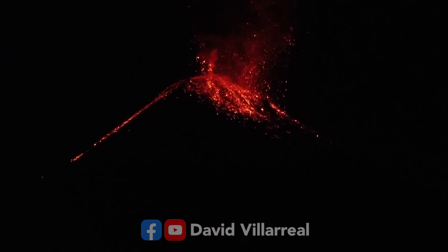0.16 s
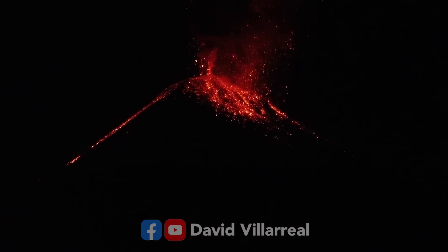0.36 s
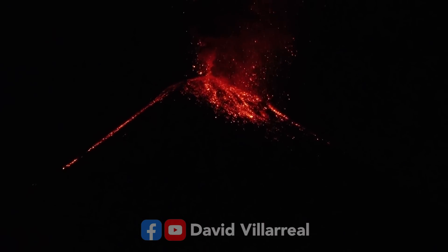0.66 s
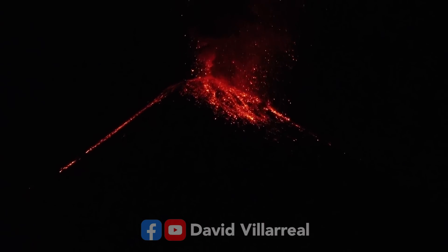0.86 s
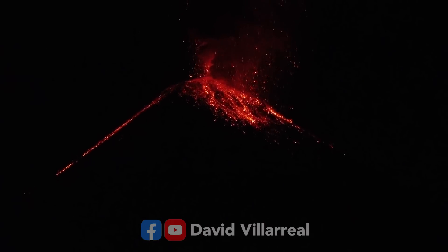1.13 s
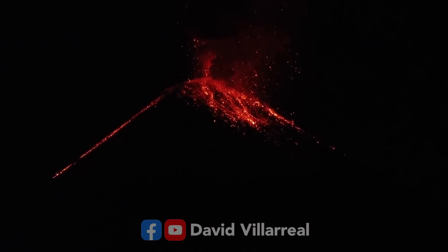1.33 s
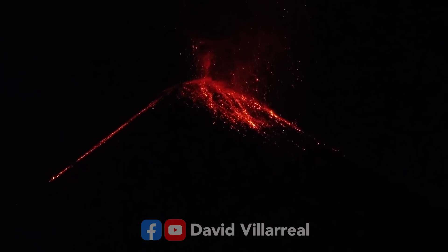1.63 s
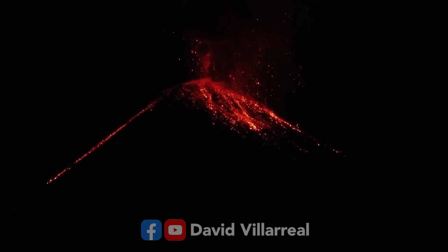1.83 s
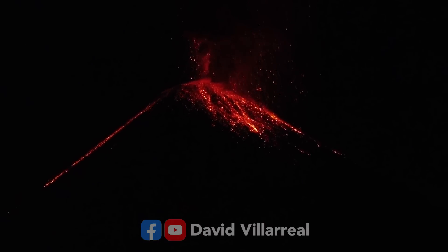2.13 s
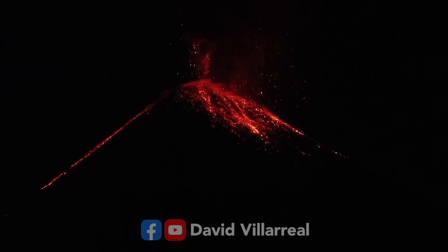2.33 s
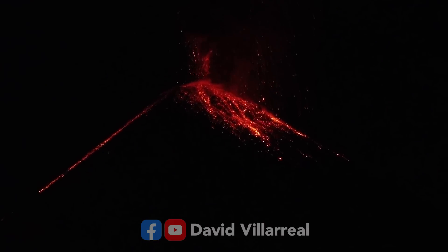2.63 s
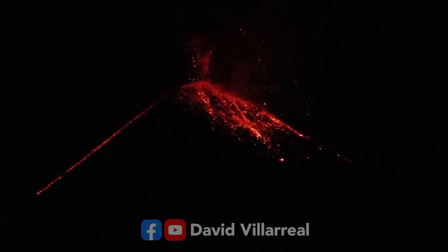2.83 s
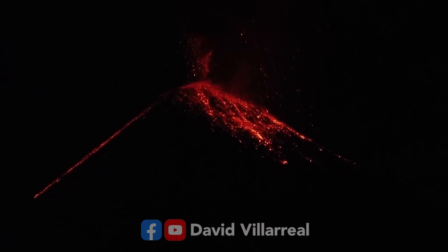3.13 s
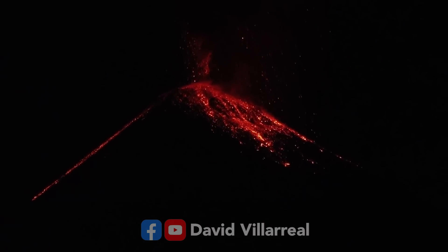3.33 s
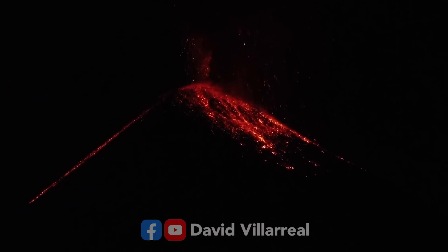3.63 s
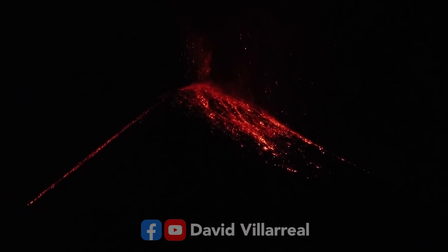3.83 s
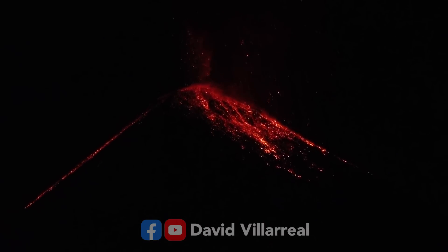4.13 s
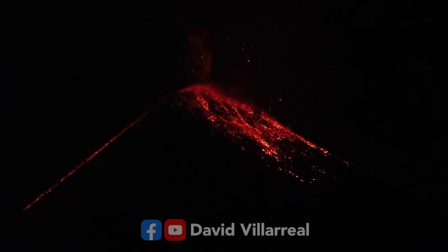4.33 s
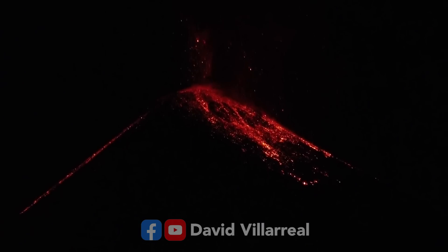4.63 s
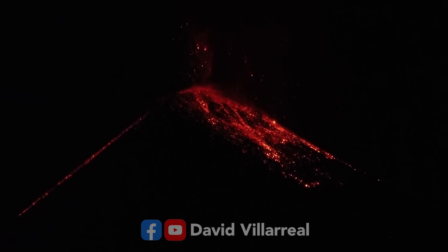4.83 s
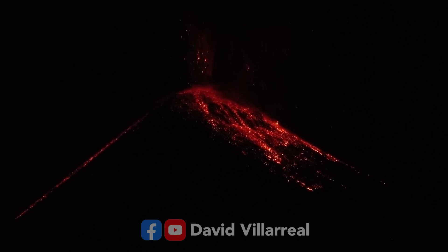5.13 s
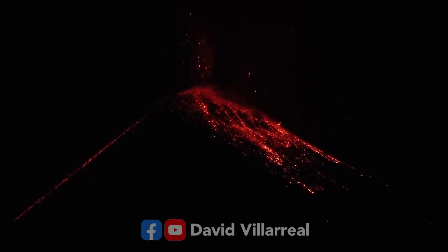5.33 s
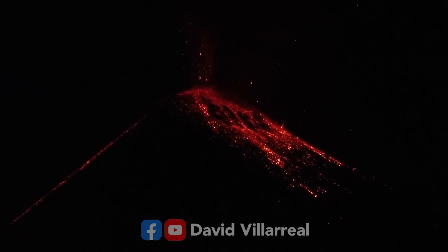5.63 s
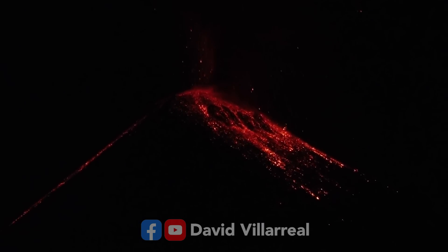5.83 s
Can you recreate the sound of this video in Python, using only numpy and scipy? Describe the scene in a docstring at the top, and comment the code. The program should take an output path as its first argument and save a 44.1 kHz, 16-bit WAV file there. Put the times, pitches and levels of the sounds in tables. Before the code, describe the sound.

Outdoors at night, a far volcanic explosion is already at full force: deep bass rumble, uneven booms and a wide roar, with gas rushing and hissing on top. After about two seconds the bright hiss drops away and the roar sinks, leaving rolling low rumble, brief soft gas surges, dull block thuds and faint stone knocks. Distant stereo pickup, with slope echoes spreading wider.

```python
"""Far volcanic blast

The blast is a deep rumble, boom, roll and roar: bands of lumpy noise that follow level curves.
Gas rushes and hisses on top in bursts and surges, six brighter bands over a slowly falling aftermath.
Echoes from the slopes widen the roar and the aftermath of the gas as they fade: more scattered noise.
Blocks land with dull thuds and stones with short knocks, each a soft burst of a few cycles."""
import sys
import numpy as np
from scipy.fft import rfft, irfft, next_fast_len
from scipy.io import wavfile
from scipy.ndimage import map_coordinates

SR = 44100
rng = np.random.default_rng(int(sys.argv[2]) if len(sys.argv) > 2 else 0)


def to_wav(s):
    """Save 16-bit WAV."""
    ch = np.atleast_2d(s).T  # columns
    pcm = np.round(np.clip(ch, -1, 1) * 32767)  # PCM
    wavfile.write(sys.argv[1], SR, pcm.astype(np.int16))


N = 263277
TIME_S = np.arange(N) / SR

# Course of the bass, only its change counts: (time [s], level [dB])
BASS_COURSE = [(0, -24), (.12, -25), (.3, -24), (.47, -25), (.65, -22), (.75, -23), (.9, -21), (1.1, -21.5),
               (1.3, -23.5), (1.52, -23.5), (1.64, -22), (1.75, -26.5), (1.95, -25.5), (2.3, -26.5),
               (2.8, -27.5), (3.15, -31), (3.3, -29), (3.9, -33), (4.1, -30.5), (4.25, -33), (4.5, -32.5),
               (4.7, -30), (5.0, -32), (5.3, -30), (5.5, -33), (5.7, -31.5), (5.97, -32)]
# Scattered against direct bass, trimmed per layer: (time [s], ratio [dB])
BASS_SCATTER = [(0, -6), (.8, -9), (1.6, -5), (3.7, -3.5), (4.4, -5), (4.9, -7), (5.97, -2.5)]


def amp(db):
    """Decibels to gain."""
    return 10 ** (np.asarray(db) / 20)


def power(db):
    """Decibels to power ratio."""
    return amp(2 * db)


def unit(x):
    """Scaled to rms 1."""
    return x / np.sqrt(np.mean(x ** 2) + 1e-20)


def curve(rows):
    """(time [s], value) rows to one value per sample."""
    s, value = np.transpose(rows)
    return np.interp(TIME_S, s, value)


def change(rows):
    """Change of a level curve since the start, dB."""
    level_db = curve(rows)
    return level_db - level_db[0]


def wobble(knots_per_s):
    """Smooth random curve through normally distributed knots."""
    knots = rng.standard_normal(int(N * knots_per_s / SR) + 4)
    return map_coordinates(knots, [np.arange(N) * knots_per_s / SR])


def filtered(x, response):
    """x times a zero-phase response of frequency in Hz."""
    m = next_fast_len(N + 8192)
    spectrum = rfft(x, m) * response(np.fft.rfftfreq(m, 1 / SR))
    return irfft(spectrum, m)[..., :N]


def sides(pan_db):
    """Left and right gains for a left minus right level, fixed or per sample."""
    return amp(np.multiply([[.5], [-.5]], pan_db))


def turbulence(colour, level_db, scattered_db, pan_db, lumps_db, lumps_per_s):
    """Stereo noise: a direct part alike on both sides, a scattered part of opposite sign."""
    hz, db = np.transpose(colour)
    lumpy = rng.standard_normal((2, N)) * amp(lumps_db * wobble(lumps_per_s))
    bands = filtered(lumpy, lambda f: amp(np.interp(np.log(f + 1), np.log(hz + 1), db)))
    direct, scattered = unit(bands)
    scattered = scattered * amp(np.minimum(scattered_db, 0))
    return np.array([direct + scattered, direct - scattered]) * amp(level_db) * sides(pan_db)


def ground():
    """Deepest rumble: noise that follows the bass course in part."""
    # (frequency [Hz], response [dB])
    colour = [(2, -6.5), (10, -4), (30, -3), (55, -1), (90, -18.5), (200, -120)]
    level_db = -24.3 + 0.74 * change(BASS_COURSE)
    scattered_db = curve(BASS_SCATTER) - .4
    return turbulence(colour, level_db, scattered_db, pan_db=1.7, lumps_db=0.6, lumps_per_s=5.5)


def boom():
    """Bass noise rolling in uneven surges."""
    # (frequency [Hz], response [dB])
    colour = [(20, -120), (40, -14.5), (65, -2.5), (100, 1), (125, -6), (170, -19.5), (400, -120)]
    # Only its change counts: (time [s], level [dB])
    course = [(0, -25), (.2, -22.5), (.42, -26), (.55, -18.5), (.7, -19), (.85, -23.5), (1.05, -21.5),
              (1.15, -24), (1.25, -22), (1.45, -21.5), (1.55, -25), (1.65, -20.5), (1.8, -25), (1.95, -23),
              (2.5, -25), (2.7, -22), (3.1, -25), (3.35, -28), (3.55, -25.5), (3.75, -27.5), (3.88, -23),
              (3.99, -30), (4.05, -28), (4.12, -23.5), (4.27, -30), (4.42, -23), (4.55, -26), (4.65, -32),
              (4.75, -26), (4.85, -29), (4.96, -25), (5.03, -29), (5.1, -24.5), (5.25, -21.5), (5.37, -28),
              (5.46, -22.5), (5.57, -30), (5.66, -25.5), (5.8, -24), (5.97, -27)]
    level_db = -25 + 1.05 * change(course)
    scattered_db = curve(BASS_SCATTER) + .4
    return turbulence(colour, level_db, scattered_db, pan_db=0, lumps_db=0.16, lumps_per_s=12)


def roll():
    """Low roll above the boom: lumpier noise on the bass course."""
    # (frequency [Hz], response [dB])
    colour = [(50, -120), (110, -5.5), (160, 0.5), (250, -2), (330, -5.5), (480, -26), (1100, -120)]
    level_db = -22.5 + .95 * change(BASS_COURSE)
    scattered_db = .5 * curve(BASS_SCATTER) - 1.5
    return turbulence(colour, level_db, scattered_db, pan_db=-.7, lumps_db=1.66, lumps_per_s=18)


def roar():
    """Roar of gas and falling rock: fading midrange noise, ever more scattered."""
    # (frequency [Hz], response [dB])
    colour = [(110, -120), (250, -9.5), (350, -1), (600, -4), (900, -10.5), (1300, -24), (3000, -120)]
    # Only its change counts: (time [s], level [dB])
    course = [(0, -23.5), (.5, -25), (1.1, -22.5), (1.46, -24), (1.7, -25), (2.0, -25.5), (2.28, -25),
              (2.38, -27), (2.5, -26.5), (2.62, -29), (2.75, -29.5), (3.15, -31), (3.4, -34.5), (3.65, -36),
              (3.9, -34), (4.1, -35), (4.3, -38.5), (4.7, -37.5), (4.97, -38), (5.5, -39), (5.97, -42)]
    level_db = -23 + 1.12 * change(course)
    scattered_db = -7 + 1.25 * TIME_S + .4
    return turbulence(colour, level_db, scattered_db, pan_db=-1, lumps_db=0.97, lumps_per_s=33)


def blast():
    """Low layers of the explosion; ground and boom drift between the slopes."""
    # (time [s], left minus right [dB])
    bass_lean = [(0, -1), (1.3, -2.5), (2.3, 0), (3.6, 2), (4.6, .2), (5.97, -2.5)]
    return (ground() + boom()) * sides(curve(bass_lean)) + roll() + roar()


def burst_power(burst_db, release_share):
    """Bright bursts from the vent: linear attack, hold, then a fall steady in dB."""
    # (start [s], attack [s], hold [s], relative strength [dB], release before the layer's share [dB/s])
    bursts = [(-.1, .012, 0.7, -.2, 36), (1.001, .007, 0.15, 1.2, 32), (1.151, 0.41, 0.36, 0.7, 34)]
    total = 0
    for start_s, attack_s, hold_s, db, fall_db_per_s in bursts:
        attack = np.clip((TIME_S - start_s) / attack_s, 0, 1)
        released_s = np.maximum(TIME_S - start_s - hold_s, 0)
        total = total + attack * power(burst_db + db - release_share * fall_db_per_s * released_s)
    return total


def surge_power(surge_db, bright_share):
    """Surges of gas: flat-topped humps in dB."""
    # (peak [s], rise [s], fall [s], relative strength [dB], brightness before the layer's share [dB])
    surges = [(.05, .1, .1, -6, -8), (.3, .16, .2, -7, 8.5), (.69, .08, .05, -8, 8), (1.52, .1, .08, -5, 7),
              (1.76, .09, .06, -8, 3), (2.05, .2, .18, -5, -12), (2.6, .14, .1, -17, 6.5),
              (3.04, .23, 0.175, 1.5, -.7), (3.54, .07, .1, -15, 6.5), (4.12, 0.31, 0.12, -5.8, -.3),
              (4.56, .08, .08, -11, 3), (4.97, 0.22, .2, -5.5, -7), (5.28, .08, .1, -13, 0)]
    edge_db, flatness = 8.5, 2.9  # loss one rise or fall time from the peak, flatness of the top
    total = 0
    for peak_s, rise_s, fall_s, db, bright_db in surges:
        distance = np.maximum((peak_s - TIME_S) / rise_s, (TIME_S - peak_s) / fall_s)
        total = total + power(surge_db + db + bright_share * bright_db - edge_db * distance ** flatness)
    return total


def flow(rule, wide_db):
    """Level and scatter of one jet layer, dB: bursts, aftermath and surges add in power."""
    # Only its change counts: (time [s], level [dB])
    aftermath = [(0, 0), (1.1, 1), (1.7, -1.5), (2.0, -.5), (2.25, -.5), (2.37, -3.5), (2.48, -3),
                 (2.6, -5.5), (2.8, -6.5), (3.15, -9), (3.33, -13), (3.5, -11), (3.9, -11), (4.25, -15),
                 (4.45, -15), (4.7, -13.5), (5.2, -15.5), (5.45, -17.5), (5.7, -17.5), (5.97, -19.5)]
    built_s = 3.43  # end of the build-up of the aftermath
    burst_db, release_share, after_db, fade_share, build_db_per_s, surge_db, bright_share = rule
    missing_db = build_db_per_s * np.maximum(built_s - TIME_S, 0)
    after = power(after_db + fade_share * change(aftermath) - missing_db)
    wide = after + burst_power(burst_db, release_share)
    straight = surge_power(surge_db, bright_share)
    echo_db = np.minimum(-6.5 + 1.2 * TIME_S + wide_db, 0)
    # surges come almost straight from the vent
    scattered = wide * power(echo_db) + straight * power(-11 + wide_db)
    total = wide + straight
    return 10 * np.log10(total), 10 * np.log10(scattered / total)


def jet():
    """Gas and ash rushing from the vent: six noise bands, each with its own flow and shared flicker."""
    # Colours: (frequency [Hz], response [dB])
    rush_colour = [(300, -120), (700, -4), (950, -1), (1250, -2.5), (1600, -11.5), (2300, -28.5),
                   (6000, -120)]
    whoosh_colour = [(500, -120), (1150, -8.5), (1600, -0.5), (2000, -3.5), (2400, -10.5), (3200, -23.5),
                     (8000, -120)]
    hiss_colour = [(900, -120), (1900, -3.5), (2500, -0.5), (3400, -4.5), (4500, -14.5), (6000, -34),
                   (12000, -120)]
    fizz_colour = [(2000, -120), (3800, -2.5), (4700, -3), (5600, -5), (6500, -14.5), (8000, -34.5),
                   (15000, -120)]
    air_colour = [(3000, -120), (5600, -8), (6700, -3), (7600, -6.5), (8400, -13), (9300, -27),
                  (14000, -120)]
    sheen_colour = [(5000, -120), (8000, -4), (9000, 0), (10000, -5), (12500, -15), (15000, -24)]
    # Flow rules: (burst [dB], share of release, aftermath before build-up loss [dB], share of fade,
    # build-up [dB/s], surge [dB], share of brightness)
    rush_rule = (-36.5, 0.3, -31, 0.87, -0.2, -36, -0.2)
    whoosh_rule = (-37.5, 0.28, -42.5, 0.53, 2, -37.5, -0.2)
    hiss_rule = (-38.1, 0.54, -49.5, 0.46, 6, -50.5, 0)
    fizz_rule = (-51.6, 1.15, -58.5, .7, 13, -59.5, 1)
    air_rule = (-68.3, .95, -69, 0.7, 10, -67, 1.05)
    sheen_rule = (-80, .9, -81.5, 0.7, 10, -84, 1)
    # (colour, rule, extra scatter [dB], share of flicker, pan [dB], lumps [dB], lump rate [1/s])
    layers = [
        (rush_colour, rush_rule, -.4, .6, -.6, .4, 40),
        (whoosh_colour, whoosh_rule, -.2, .72, -.8, .55, 40),
        (hiss_colour, hiss_rule, 1.5, 1.05, -.9, .74, 50),
        (fizz_colour, fizz_rule, 2.2, 1.2, -1.1, .9, 70),
        (air_colour, air_rule, 2.8, 1.3, -1.3, 1.2, 90),
        (sheen_colour, sheen_rule, 3, 1.3, .6, 1.2, 90)]
    flicker_db = 0.29 * wobble(30)  # turbulence that moves all layers together
    out = 0
    for colour, rule, wide_db, flicker_share, pan_db, lumps_db, lumps_per_s in layers:
        level_db, scattered_db = flow(rule, wide_db)
        level_db = level_db + flicker_share * flicker_db
        out = out + turbulence(colour, level_db, scattered_db, pan_db, lumps_db, lumps_per_s)
    return out


def blob(t, hz, cycles):
    """Soft burst of a few cycles: distance rounds off both its start and its end."""
    u = t * hz / cycles
    envelope = (u * np.exp(1 - u)) ** 2
    return envelope * np.sin(2 * np.pi * hz * t + rng.uniform(0, 2 * np.pi))


def add_hit(out, start_s, hit):
    """Adds a stereo hit to out at its start."""
    start = round(start_s * SR)
    out[:, start:start + hit.shape[1]] += hit


def stones():
    """Small stones knock: a low blob with a clack and a bright tick on top."""
    # (start [s], level before trim [dB], pitch [Hz], clack [dB], tick [dB], left minus right [dB])
    knocks = [(0.321, -11, 516, -12, -24.5, 2), (0.706, -20, 500, -8, -14, 0),
              (0.875, -13.5, 630, -18, -33.5, 4), (1.983, -17, 513, -12, -17, 0),
              (2.152, -12, 610, -12.5, -32, -1), (2.168, -26, 600, -8, -13, -2),
              (2.275, -14, 680, -20, -40, 0), (3.892, -17, 400, -18, -36, 0), (4.339, -30, 500, -8, -20, 0),
              (4.643, -26, 649, -18, -30, -1), (4.715, -19.5, 480, -16, -38, 5),
              (4.724, -19, 340, -22, -40, 3), (4.735, -21, 300, -22, -40, 3),
              (5.198, -25, 1080, -10, -36, 2), (5.378, -29, 900, 3, -10, -3),
              (5.674, -26, 695, -18, -32, -3), (5.895, -25.5, 740, -20, -40, -15)]
    out, t = np.zeros((2, N + SR)), np.arange(SR // 4) / SR
    late = np.maximum(t - .0016, 0)  # the bright parts start later than the knock
    for s, db, hz, clack_db, tick_db, pan_db in knocks:
        knock = blob(t, hz, cycles=1.2)
        clack = amp(clack_db) * blob(late, 1400, cycles=1.3)
        tick = amp(tick_db) * blob(late, 4100, cycles=1.2)
        add_hit(out, s, amp(db - 2) * sides(pan_db) * (knock + clack + tick))
    return out[:, :N]


def blocks():
    """Big blocks land as dull thuds: one low blob each."""
    # (start [s], level before trim [dB], pitch [Hz], left minus right [dB])
    thuds = [(0.54, -4.5, 96, -7), (0.648, -6.5, 72.5, 0), (1.221, -10.5, 63.3, -6),
             (1.66, -4.5, 97.5, 9.5), (1.975, -9.5, 78.1, -4), (2.388, -11, 88.8, 0.5),
             (2.691, -8, 77.6, -8), (2.928, -11, 95, -9), (3.472, -12, 80, 0), (3.869, -5.5, 93.6, 7.5),
             (4.089, -17, 82, -0.5), (4.376, -6.5, 105.7, 10), (4.705, -18.5, 83, -1),
             (4.968, -7.5, 107.7, 0), (5.05, -13, 83, -2), (5.188, -9, 80.7, -5.0), (5.23, -11, 75, -4),
             (5.419, -13, 106, -9), (5.748, -11, 78.4, -3)]
    out, t = np.zeros((2, N + SR)), np.arange(SR // 4) / SR
    for s, db, hz, pan_db in thuds:
        add_hit(out, s, amp(db - 6.5) * sides(pan_db) * blob(t, hz, cycles=1.27))
    return out[:, :N]


def scene():
    """Sum of all sources, stereo."""
    return blast() + jet() + stones() + blocks()


def record(dry):
    """Sharp band limit and the steady bias of the converter."""
    top_hz, bias = 15000, .0101
    return filtered(dry, lambda hz: hz < top_hz) + bias


dry = scene()
out = record(dry)
to_wav(out)
```